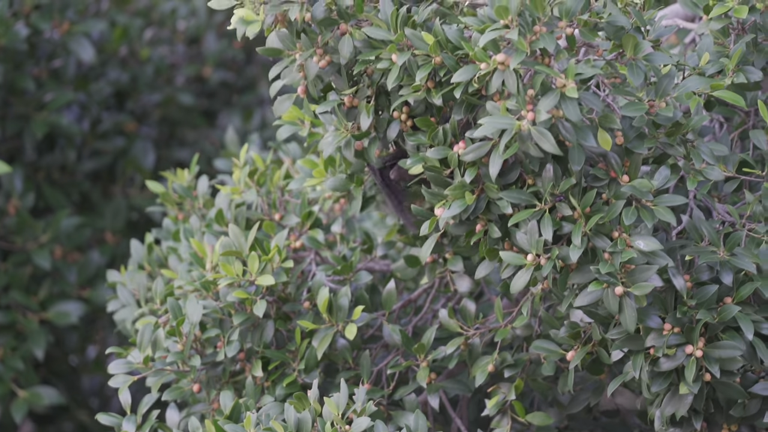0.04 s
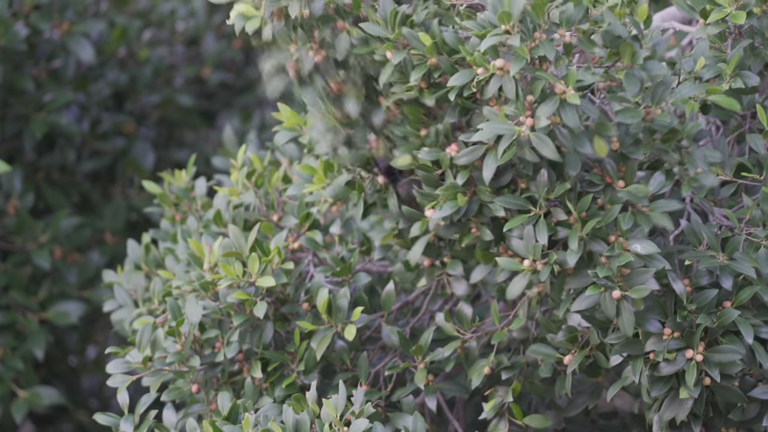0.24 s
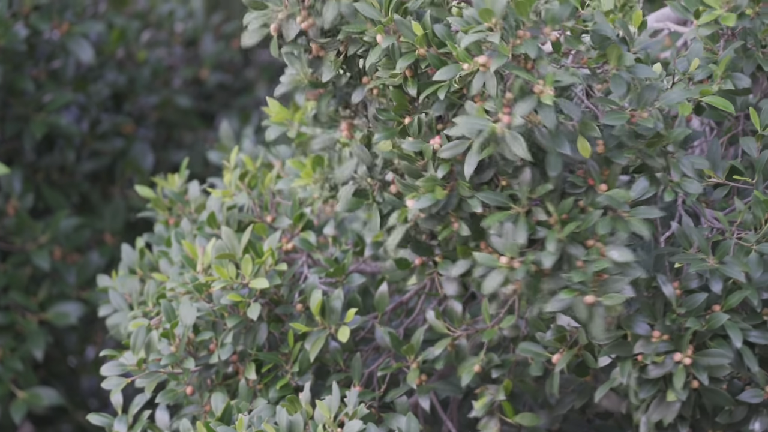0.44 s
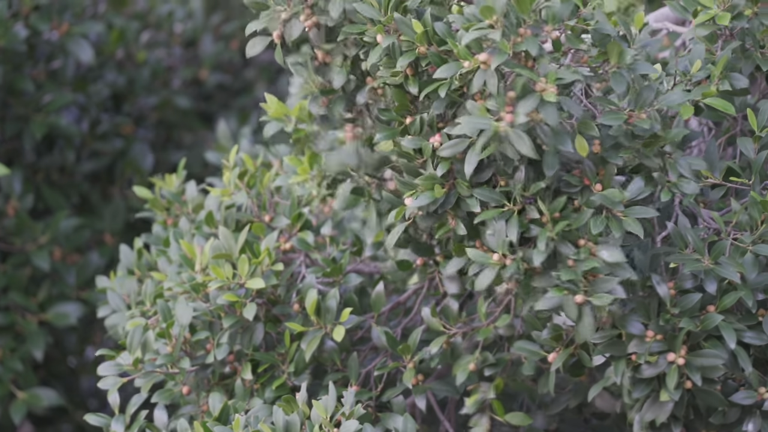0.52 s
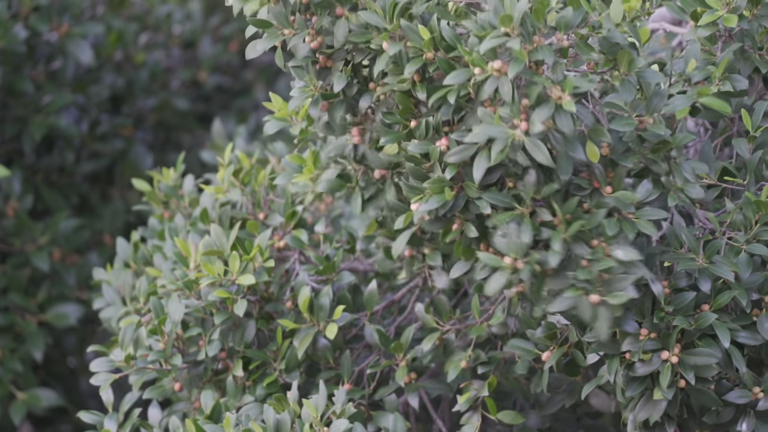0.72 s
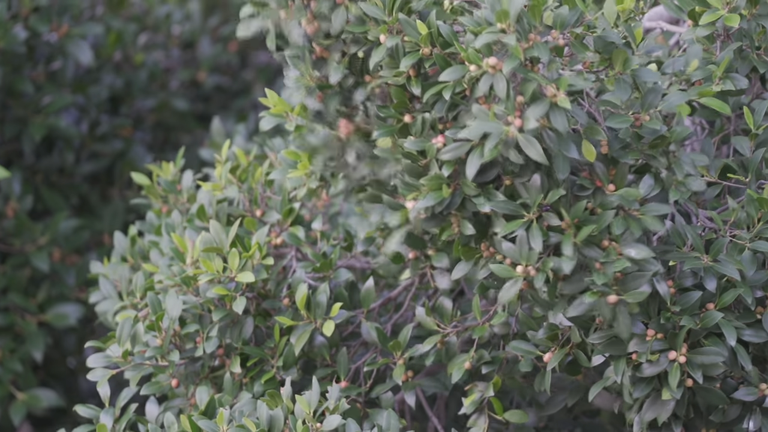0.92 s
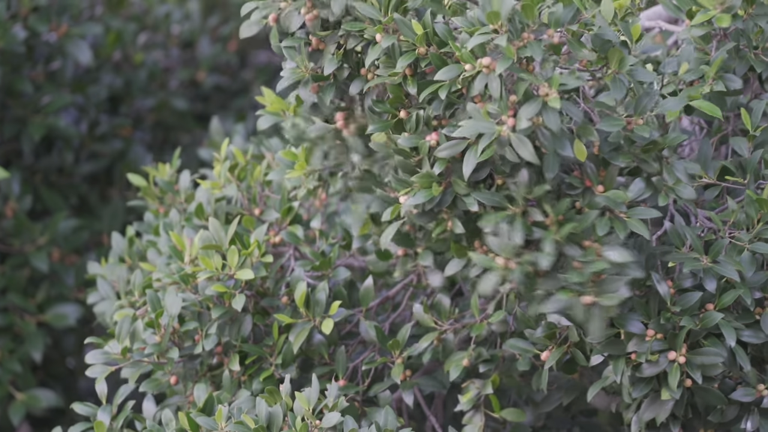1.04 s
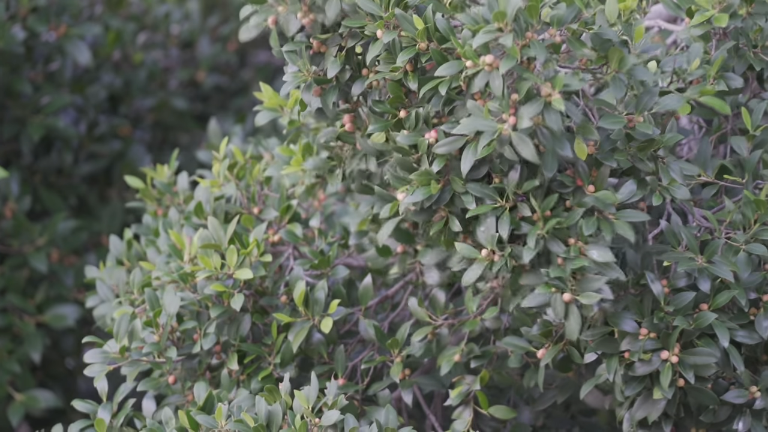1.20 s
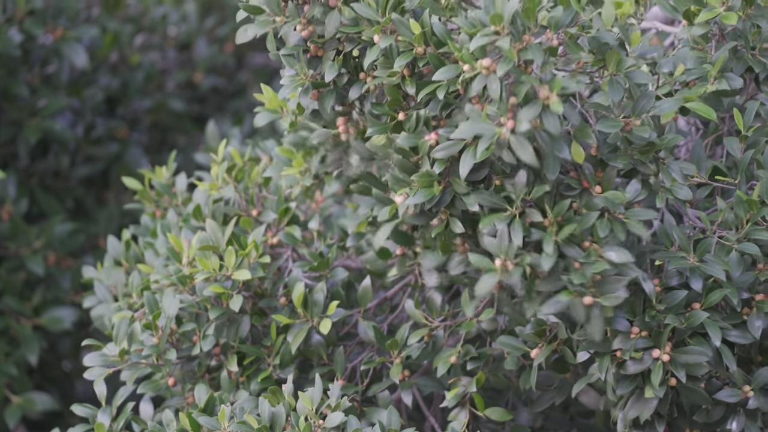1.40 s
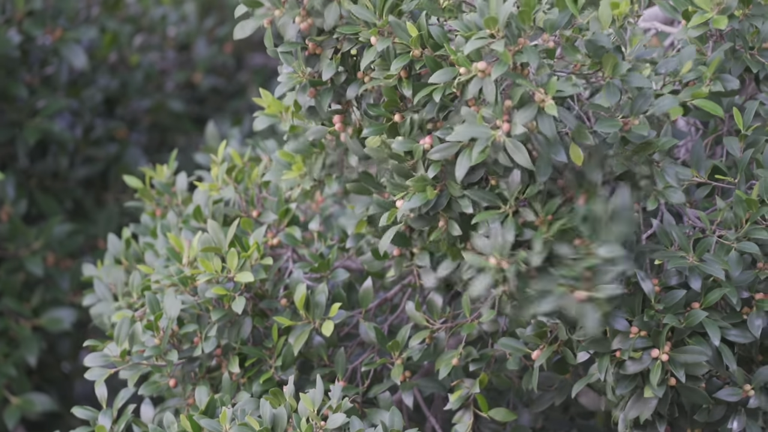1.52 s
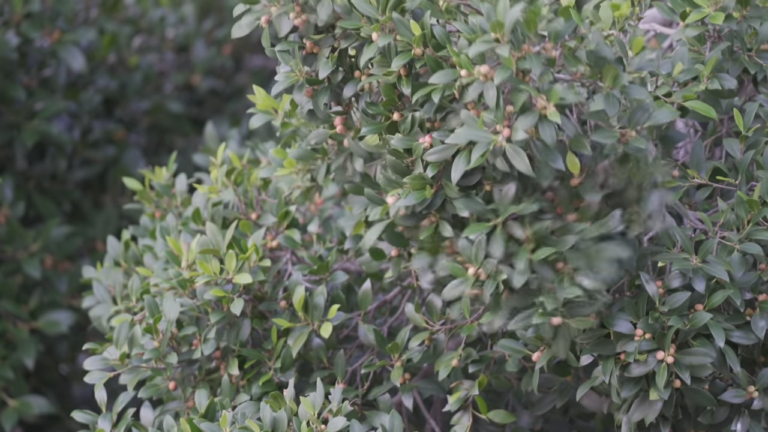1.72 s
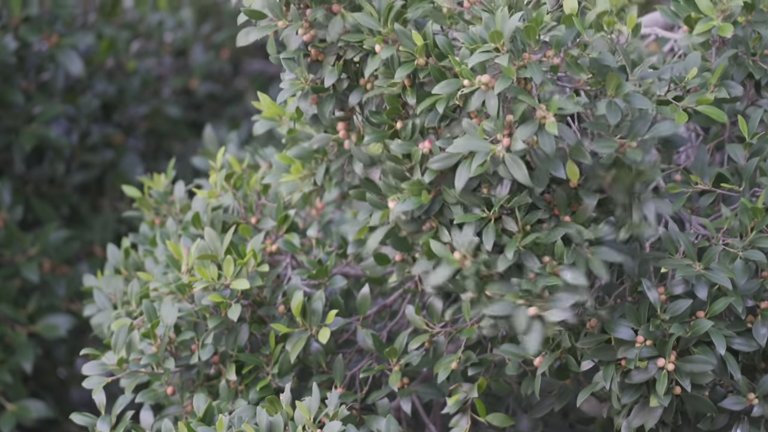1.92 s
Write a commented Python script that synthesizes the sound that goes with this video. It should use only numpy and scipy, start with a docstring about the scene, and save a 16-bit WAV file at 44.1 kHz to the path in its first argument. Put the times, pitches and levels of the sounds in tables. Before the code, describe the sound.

Fruit bats squabble to the left: a trilled squeal rises at 0.18 s into the loudest piercing screech at 0.3-0.42 s, then thin higher squeaks at 0.45-0.73 s, hoarse chatter with rustling leaves to 0.97 s, and overlapping low and high screeches until 1.19 s. A short echo and diffuse tail follow. Distant traffic hums; wind thumps around 0.57 s and 1.3-1.6 s; faint far whistles from 1.78 s.

```python
"""Fruit bats squabble in a tree: whistling screeches in a low and a high register, trilling at times.
Each screech is a stack of overtones on a moving pitch, roughened by noise. A wall throws one echo back and
the foliage smears a tail. Faint bats whistle from other trees, and shaken leaves give grainy treble bursts.
Distant traffic is shaped noise with humming tones; wind rumbles on the microphone as slow lumps of bass."""
import sys
import numpy as np
from scipy import signal
from scipy.fft import rfft, irfft, next_fast_len
from scipy.io import wavfile
from scipy.ndimage import map_coordinates

SR = 44100
rng = np.random.default_rng(int(sys.argv[2]) if len(sys.argv) > 2 else 0)


def put_to_file(sound):
    """Save the sound as 16-bit audio at rate SR, in the file named by the first command-line argument."""
    columns = np.atleast_2d(sound).T  # one column per channel
    safe = np.clip(columns, -1, 1)
    whole_steps = np.round(safe * 32767)
    wavfile.write(sys.argv[1], SR, whole_steps.astype(np.int16))


def rack_gain(trim_db):
    """Turn a fader trim in dB into the linear factor to multiply a signal by."""
    fader = np.asarray(trim_db, float)
    return 10 ** (fader / 20)


N = 85995
T = np.arange(N) / SR  # time in s

# trilled stretches: start_s, end_s, depth (0-1)
TRILLS = [(.17, 0.244, 0.77), (0.256, 0.29, 0.47), (0.783, 0.797, 0.2)]
# calls in the low register: third_overtone_db, hoarseness (0-1), then points of time_s, pitch_hz, level_db
LOW_SCREECHES = [ (-19, 0.13, [(.18, 2060, -51), (.24, 2340, -34), (.243, 2647, -32), (.256, 2620, -32),
                 (.26, 2530, -33), (.286, 2500, -29)]), (-13.5, 0.033, [(.287, 2790, -26),
                 (.303, 3056, -28), (.306, 2773, -25), (.325, 3047, -28), (.329, 2681, -26),
                 (.36, 2610, -31.5), (.375, 2827, -23.5), (.416, 3000, -26.5), (.426, 3300, -49)]),
                 (-22, 0.11, [(.647, 2948, -44.5), (.691, 2556, -39.5), (.696, 2940, -49)]),
                 (-13.5, 0.2, [(.73, 3290, -39), (.742, 3138, -43.5), (.755, 3162, -37.5),
                 (.768, 2676, -35), (.79, 2785, -39), (.796, 2960, -40.5), (.803, 2510, -43),
                 (.815, 2410, -43)]), (-10, 0.37, [(.945, 2800, -43.5), (.96, 2560, -41),
                 (.966, 2880, -41)]), (-19.5, 0.21, [(.988, 2736, -39), (1.002, 2809, -31),
                 (1.02, 2798, -27.5), (1.027, 2683, -26), (1.036, 3130, -31)]),
                 (-28, 0.14, [(1.108, 3410, -45), (1.115, 3073, -28.5), (1.14, 3087, -31.5),
                 (1.182, 3092, -39.5)])]
# calls in the high register, and two echoes of such calls (at .655 and 1.003 s): the same columns
HIGH_SCREECHES = [ (-21, .3, [(.13, 4010, -55.5), (.165, 3950, -58)]), (-30, .2, [(.345, 4070, -53),
                  (.367, 3460, -42)]), (-50.5, 0.18, [(.43, 4200, -64), (.452, 3920, -40)]),
                  (-83, 0.45, [(.468, 4064, -59), (.496, 4200, -35), (.508, 4150, -99), (.524, 4067, -37.5),
                  (.556, 4145, -42)]), (-48, 0.11, [(.615, 4414, -49), (.635, 4110, -36),
                  (.646, 4200, -33)]), (-32, 0.22, [(.655, 4380, -47), (.697, 4160, -38)]),
                  (-38, .1, [(.696, 3816, -26), (.712, 3980, -42), (.731, 3740, -33.5)]),
                  (-26, 1, [(.905, 3640, -53), (.935, 3584, -47)]), (-16, 0.11, [(.965, 3750, -37.5),
                  (.99, 3740, -35)]), (-30, .2, [(1.003, 3760, -46), (1.025, 3770, -40)]),
                  (-29, 0.51, [(1.033, 4060, -40), (1.06, 4360, -35.5), (1.085, 4397, -34.5),
                  (1.094, 4307, -37), (1.105, 4300, -28.5), (1.122, 4330, -37), (1.136, 4333, -36),
                  (1.19, 4380, -40.5)])]
# the other overtones of each register: multiple of the pitch, level_db
LOW_OVERTONES = {1: -7.5, 2: 0, 4: -22, 5: -38}
HIGH_OVERTONES = {1: 0, 2: -12.5}
# throat colour of the breath noise: frequency_hz, relative level_db (per Hz)
BREATH_COLOUR = [(2000, -10.5), (4000, 9.5), (10000, -10.5), (11700, -3), (15500, -25)]
# how much of the left lean each frequency takes: frequency_hz, share (0-1)
LEAN_SHARE = [(6000, 0.95), (9000, 0.41)]
# how long the foliage tail takes to fall by 60 dB: frequency_hz, fall_s
TAIL_FALL = [(2000, 2.7), (5000, 0.94), (12000, 0.54)]
# far bats: start_s, length_s, start_pitch_hz, end_pitch_hz, level_db
FAR_CALLS = [(1.78, 0.061, 3300, 3130, -53), (1.848, 0.05, 2760, 2780, -52.5),
             (1.907, 0.057, 2900, 2670, -51)]
# shaken leaves: centre_s, spread_s, level_db
RUSTLES = [(0.79, 0.054, -43), (.93, 0.16, -49), (1.495, .006, -49.5), (1.785, 0.11, -52.5)]
# colour of the leaves: frequency_hz, relative level_db (per Hz)
LEAF_COLOUR = [(1500, -33), (3500, 13), (7000, -2), (12000, -6.5), (15500, -28)]
# colour of the traffic: frequency_hz, relative level_db (per Hz)
TRAFFIC_COLOUR = [(41, -26), (70, -4.5), (181, -6.5), (227, -7), (304, -9), (398, -9), (446, -10.5),
                  (1180, -11), (4170, -30), (15500, -46)]
# likeness of left and right traffic: frequency_hz, likeness (1 = the same, 0 = unrelated)
TRAFFIC_LIKENESS = [(60, 1), (240, 0.97), (950, 0.52), (3770, 0.027), (15000, 0.08)]
# sideways balance of the traffic: frequency_hz, left_over_right_db
TRAFFIC_BALANCE = [(60, -0.5), (380, 1), (2380, 3), (15000, -3.5)]
# hum of far machinery: pitch_hz, level_db
HUM_TONES = [(175, -53.5), (300, -51.5)]
# strength of the wind: time_s, level_db
WIND_LEVEL = [(0, -46.5), (.3, -63), (.57, -36), (0.802, -52), (1.3, -41.5), (1.6, -42), (1.95, -55.5)]
# colour of the wind: frequency_hz, relative level_db (per Hz)
WIND_COLOUR = [(9, -39), (15, -8.5), (43, -2.5), (90, -9.5), (150, -62)]

TRILL_HZ, TRILL_PITCH_SWING, TRILL_LEVEL_SWING = 180, .045, .6  # swings are fractions at full depth
PITCH_SCATTER = 0.0063  # fraction of the pitch
LOW_SHIMMER_DB, HIGH_SHIMMER_DB = 1, 1.5  # level scatter of each overtone
EDGE_S = 0.0012  # rise and fall of a call
RASP_DB, RASP_RATE = -21, 698.7  # noise round an overtone of a clean voice; its random knots per second
FRAY_DB = 10  # more rasp for each overtone above the second
BREATH_DB, HOARSE_DB = -23, 22  # breath of a clean voice; more rasp and breath at full hoarseness
BRIGHTEN, EFFORT_REF_DB = 0.19, -30.5  # dB of brightening per dB of effort; call level where it is zero
LOW_LEFT_DB, HIGH_LEFT_DB, TREE_LEFT_DB = 10, 7.5, 1.7  # left over right, before LEAN_SHARE
ECHO_S, ECHO_DB, TAIL_DB = .032, -12.5, -6.5  # wall echo delay and level; foliage tail level
FLUTTER_RAD, FLUTTER_RATE = 1.3, 300  # phase swing of the tail; random knots per second
TRAFFIC_DB = -41


def unit(x):
    """Scale to an rms of 1."""
    return x / np.sqrt(np.mean(x ** 2) + 1e-20)


def along(points, hz):
    """Read a curve of (frequency, value) points, with frequency on a log axis."""
    f, value = np.transpose(points)
    return np.interp(np.log(hz + 1), np.log(f + 1), value)


def wobble(rate):
    """A smooth random curve through rate random knots a second."""
    knots = rng.standard_normal(int(N * rate / SR) + 4)
    return map_coordinates(knots, [T * rate])


def gate(start, end, edge):
    """1 between two times and 0 elsewhere, with soft edges."""
    return np.clip(np.minimum(T - start, end - T) / edge + .5, 0, 1)


def filtered(x, response):
    """Multiply the spectrum of x by a function of frequency."""
    size = next_fast_len(N + 8192)
    hz = np.fft.rfftfreq(size, 1 / SR)
    return irfft(rfft(x, size) * response(hz), size)[..., :N]


def lean_left(x, db):
    """Raise the left and lower the right, by an amount that varies with frequency."""
    return filtered(x, lambda hz: rack_gain(db * along(LEAN_SHARE, hz) * [[.5], [-.5]]))


def screeches(calls, overtones, shimmer_db):
    """Overtones follow each row's pitch; the trill swings pitch and level, noise frays the upper overtones."""
    depth = sum(d * gate(start, end, 0.0069) for start, end, d in TRILLS)
    trill = np.sin(2 * np.pi * TRILL_HZ * T)
    bend = 1 + TRILL_PITCH_SWING * depth * trill + PITCH_SCATTER * wobble(300)
    # the level swing lags the pitch swing by 60 samples
    throb = np.abs(1 + TRILL_LEVEL_SWING * depth * np.roll(trill, 60))
    rasp = {k: wobble(RASP_RATE) + 1j * wobble(RASP_RATE) for k in range(1, 6)}
    shimmer = {k: rack_gain(shimmer_db * wobble(90)) for k in range(1, 6)}
    breath = unit(filtered(rng.standard_normal(N), lambda hz: rack_gain(along(BREATH_COLOUR, hz))))
    strongest = max(overtones, key=overtones.get)
    out = np.zeros(N)
    for third_db, hoarse, points in calls:
        time, pitch, level = np.transpose(points)
        phase = 2 * np.pi * np.cumsum(np.interp(T, time, pitch) * bend) / SR
        level_db = np.interp(T, time, level)
        effort_db = BRIGHTEN * (level_db - EFFORT_REF_DB)
        stack = np.zeros(N)
        for k, db in {**overtones, 3: third_db}.items():
            noise = rack_gain(RASP_DB + FRAY_DB * max(k - 2, 0) + HOARSE_DB * hoarse)
            rough = np.imag(np.exp(1j * k * phase) * (1 + noise * rasp[k])) / np.hypot(1, noise)
            # effort lifts overtones above the strongest and lowers those below it
            stack += rack_gain(db + effort_db * np.sign(k - strongest)) * shimmer[k] * rough
        voice = np.sqrt(2) * stack + rack_gain(BREATH_DB + HOARSE_DB * hoarse) * breath
        out += rack_gain(level_db) * gate(time[0], time[-1], EDGE_S) * throb * voice
    return out


def tree(x):
    """One wall echo, and a spread-out tail that dies at its own pace at each frequency."""
    # moving leaves blur the pitch lines of the tail
    blurred = np.real(signal.hilbert(x) * np.exp(1j * FLUTTER_RAD * wobble(FLUTTER_RATE)))
    hz, t, spectrum = signal.stft(rng.standard_normal((2, SR)), SR, nperseg=256)
    decay = rack_gain(-60 * t / along(TAIL_FALL, hz)[:, None])
    onset = np.clip(t / 0.0078, 0, 1)
    tail = signal.istft(spectrum * decay * onset, SR, nperseg=256)[1]
    wash = signal.fftconvolve(blurred[None], tail / np.linalg.norm(tail[0]), axes=1)[:, :N]
    echo = np.pad(x, (round(ECHO_S * SR), 0))[:N]
    return rack_gain(TAIL_DB) * wash + rack_gain(ECHO_DB) * echo


def far_bats():
    """Faint whistles from other trees: single gliding tones that waver in pitch and level."""
    out = np.zeros(N)
    for start, length, first_hz, last_hz, db in FAR_CALLS:
        level = rack_gain(db + 1.9 * wobble(79.2)) * gate(start, start + length, 0.0098)
        pitch = np.interp(T, [start, start + length], [first_hz, last_hz]) * (1 + .04 * wobble(300))
        out += level * np.sin(2 * np.pi * np.cumsum(pitch) / SR)
    return out


def leaves():
    """Shaken branches: grainy treble noise that swells and fades in smooth humps."""
    grains = rng.standard_normal((2, N)) * rack_gain(2.5 * wobble(400))
    swell = sum(rack_gain(db) * np.exp(-((T - centre) / spread) ** 2 * 2) for centre, spread, db in RUSTLES)
    return swell * unit(filtered(grains, lambda hz: rack_gain(along(LEAF_COLOUR, hz))))


def traffic():
    """Wide far noise, nearly the same on both sides in the bass, with wavering hum tones."""
    def middle_and_side(hz):
        angle = np.arccos(np.clip(along(TRAFFIC_LIKENESS, hz), -1, 1)) / 2
        return rack_gain(along(TRAFFIC_COLOUR, hz)) * [np.cos(angle), np.sin(angle)]

    mid, side = filtered(rng.standard_normal((2, N)), middle_and_side)
    pair = np.array([mid + side, mid - side])
    pair = filtered(pair, lambda hz: rack_gain(along(TRAFFIC_BALANCE, hz) * [[.5], [-.5]]))
    hum = sum(rack_gain(db + 2 * wobble(7.9)) * np.sin(2 * np.pi * hz * T + .5 * wobble(6.4))
              for hz, db in HUM_TONES)
    return rack_gain(TRAFFIC_DB + 0.17 * wobble(4.6)) * pair / np.std(pair.mean(0)) + hum


def wind():
    """Wind on the microphone: bass noise in slow lumps, mostly alike on both sides."""
    a, b = filtered(rng.standard_normal((2, N)), lambda hz: rack_gain(along(WIND_COLOUR, hz)))
    time, db = np.transpose(WIND_LEVEL)
    level = rack_gain(np.interp(T, time, db) + 1.46 * wobble(8.7))
    return level * np.array([a + 0.12 * b, a - 0.23 * b]) / np.std(a)


def scene():
    """Bats on the left, in their tree, over the background."""
    low = screeches(LOW_SCREECHES, LOW_OVERTONES, LOW_SHIMMER_DB)
    high = screeches(HIGH_SCREECHES, HIGH_OVERTONES, HIGH_SHIMMER_DB)
    bats = lean_left(low, LOW_LEFT_DB) + lean_left(high, HIGH_LEFT_DB)
    reflections = lean_left(tree(low + high), TREE_LEFT_DB)
    return bats + reflections + far_bats() + leaves() + traffic() + wind()


def roll_off(x):
    """The treble ends steeply here."""
    return signal.sosfilt(signal.butter(12, 15610, fs=SR, output="sos"), x)


def record(dry):
    """Hand on the finished mix as it is heard."""
    return roll_off(dry)


dry = scene()
out = record(dry)
put_to_file(out)
```